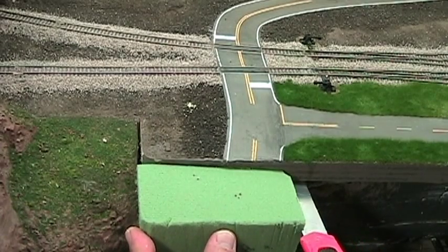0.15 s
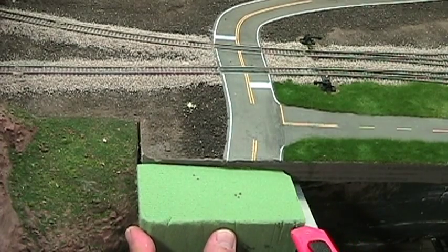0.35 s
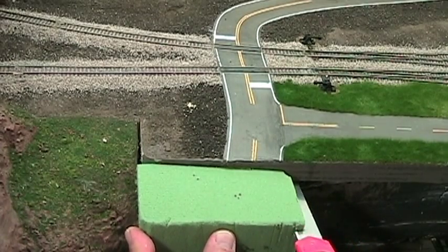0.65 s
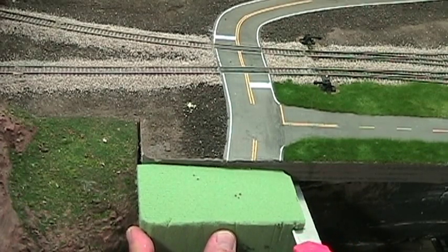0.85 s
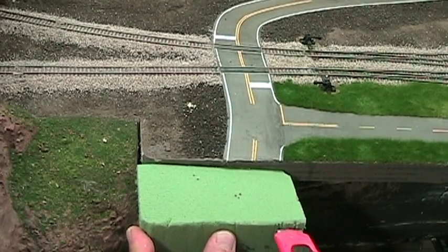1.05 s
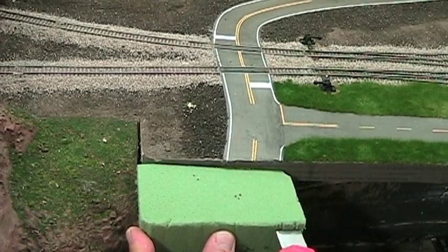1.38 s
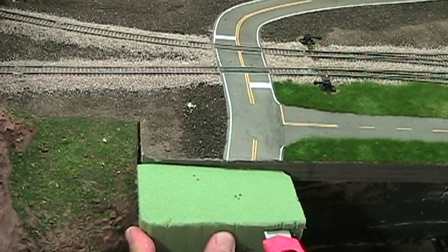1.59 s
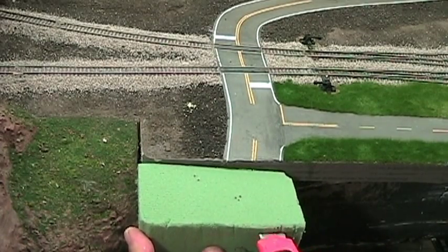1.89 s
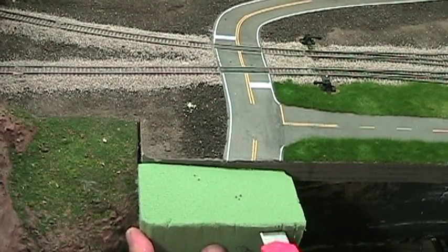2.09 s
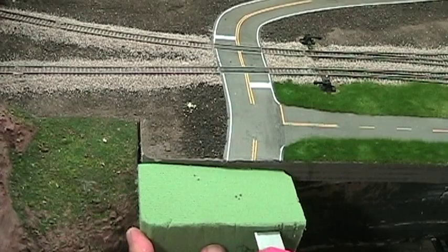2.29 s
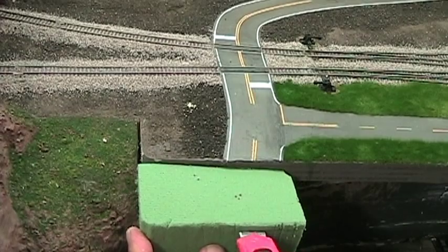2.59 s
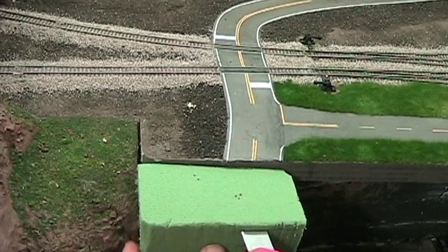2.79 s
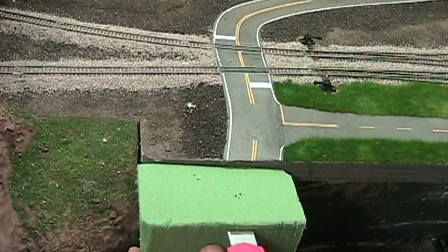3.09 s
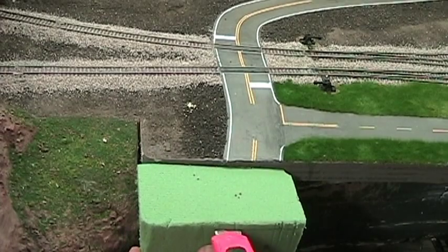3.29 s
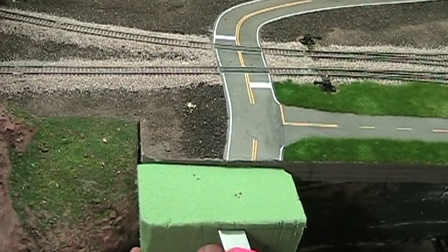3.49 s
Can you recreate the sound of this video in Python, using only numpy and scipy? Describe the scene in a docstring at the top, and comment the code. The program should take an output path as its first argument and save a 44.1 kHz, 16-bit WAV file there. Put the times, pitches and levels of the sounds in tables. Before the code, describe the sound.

Close up in a small room, a blade rasps through a foam block: brittle, bright strokes with snaps early on, smoother return scrapes, then fuller-bodied strokes and light scrapes at the end, over quiet room noise.

```python
"""A utility knife saws a block of rigid foam in a small room, close to a pair of microphones.
Room rumble and hissing air run throughout as coloured noise. The end of a light scrape opens the take,
then pushes burst dense streams of brittle cells, with snaps as clumps give way. Softer, smoother pulls
fall between them, and two end in dull shudders. The rasp gains body as the blade sinks deeper; a faint
sinking tone joins from 2.15 s, and light scrapes close the take. A ring and a short tail follow the knife."""
import sys
import numpy as np
from scipy import signal
from scipy.fft import rfft, irfft
from scipy.io import wavfile
from scipy.ndimage import uniform_filter1d

SR = 44100
rng = np.random.default_rng(int(sys.argv[2]) if len(sys.argv) > 2 else 0)


def digitize_waveform(pressure):
    """Quantize a signal to 16-bit integers and store it at the path in sys.argv[1].

    Rows of a 2-D input are taken as channels; values are limited to [-1, 1].
    """
    field = np.atleast_2d(pressure).T
    bounded = np.clip(field, -1, 1)
    quanta = np.round(bounded * 32767).astype(np.int16)
    wavfile.write(sys.argv[1], SR, quanta)


N = 160965  # length [samples]


def amp(db):
    """Decibels to gain."""
    return 10 ** (np.asarray(db) / 20)


def unit(x):
    """Scales to rms 1."""
    return x / np.sqrt(np.mean(x ** 2) + 1e-20)


def read(points, hz):
    """Reads a table along log frequency."""
    p = np.array(points, float)
    return np.interp(np.log(hz + 1), np.log(p[:, 0] + 1), p[:, 1])


def add(mix, start_s, sound):
    """Mixes a sound in at a time, dropping what falls outside the take."""
    at = round(start_s * SR)
    sound = sound[..., max(-at, 0):]
    part = mix[..., max(at, 0):][..., :sound.shape[-1]]
    part += sound[..., :part.shape[-1]]


def bell(hz, centre, octaves):
    """A bump of height 1 on the log frequency axis."""
    return np.exp(-.5 * (np.log2((hz + 1) / centre) / octaves) ** 2)


def bins(size=4096):
    """Frequencies on which colours are drawn."""
    return np.fft.rfftfreq(size, 1 / SR)


def colour(x, db):
    """Causal minimum-phase filter with the given gain curve, along the last axis."""
    log_gain = np.log(amp(np.r_[db, db[-2:0:-1]]))
    taps = np.fft.ifft(np.exp(np.conj(signal.hilbert(log_gain)))).real
    return signal.fftconvolve(x, taps[None, :len(db)], axes=1)[:, :x.shape[1]]


def noise(spectrum, channels):
    """Steady coloured room noise of rms 1."""
    return unit(colour(rng.standard_normal((channels, N)), read(spectrum, bins())))


# colour of the low room noise: (frequency [Hz], relative density [dB per Hz])
RUMBLE_SPECTRUM = [(20, -24), (35, -12), (55, -6), (110, -1), (180, -5), (280, -7.5), (450, -16),
                   (800, -16.5), (3000, -55)]
# how loud it reaches the microphones: (time [s], level [dB])
RUMBLE_LEVEL = [(0, -44), (.85, -43), (1.15, -48), (1.4, -43), (2.5, -43), (3.65, -42.5)]


def rumble():
    """Low room noise with a slowly moving level, opposite in the two channels."""
    level_db = np.interp(np.arange(N) / SR, *np.transpose(RUMBLE_LEVEL))
    return np.array([[1], [-1]]) * noise(RUMBLE_SPECTRUM, channels=1) * amp(level_db)


# colour of the airy room noise: (frequency [Hz], relative density [dB per Hz])
AIR_SPECTRUM = [(30, -11), (150, 0.5), (300, 3.5), (500, -4), (800, -1.5), (1200, 5), (1500, -5.5),
                (1950, 1.5), (2500, -2.5), (6000, -4.5), (10200, 1.5), (12500, -8), (15000, -30)]
AIR_DB = -43.5


def air():
    """Steady wide-band room noise; rows: direct and scattered sound."""
    return amp(AIR_DB) * noise(AIR_SPECTRUM, channels=2)


# resonances of block and knife: (frequency [Hz], width [octaves], gain [dB])
BODY = [(333, 0.047, 3), (430, 0.034, -10), (534, 0.14, 0.5), (760, 0.025, 0.5), (856, 0.015, 4.5),
        (966, 0.012, 4), (1060, 0.061, -2.5), (1180, 0.02, 3), (1340, 0.027, -5), (1393, 0.038, 3.5),
        (1642, 0.028, 3), (1900, 0.045, 3), (2113, 0.015, 2.5), (2680, 0.015, 3), (3010, 0.013, 2),
        (3410, .01, 2), (3860, 0.0077, 2), (4360, 0.0085, 2.5), (5500, .02, 2.5), (7660, .012, 0.5),
        (8500, .02, 0.5)]
NARROWEST_OCT = .024  # narrower resonances are widened to this
MIDDLE_HZ, MIDDLE_OCT, RING_OCT, HISS_HZ, HISS_OCT = 1840, 1, 0.14, 8600, 0.59
EDGE_ORDER, EDGE_LEAK_DB = 6.7, -10  # steepness of the bass edge, and the most it takes away


def foam(rasp, edge_hz, middle_db, ring_hz, ring_db, hiss_db):
    """Gain curve of block and blade: rasp, bass edge, resonances, middle, blade ring and hiss."""
    hz = bins()
    bass_cut = -10 * np.log10(1 + (edge_hz / (hz + 1)) ** (2 * EDGE_ORDER))
    edge = np.maximum(bass_cut, EDGE_LEAK_DB)
    body = sum(db * bell(hz, f, max(width, NARROWEST_OCT)) for f, width, db in BODY)
    middle = middle_db * bell(hz, MIDDLE_HZ, MIDDLE_OCT)
    ring = ring_db * bell(hz, ring_hz, RING_OCT)
    hiss = hiss_db * bell(hz, HISS_HZ, HISS_OCT)
    return read(rasp, hz) + edge + body + middle + ring + hiss


FLUTTER_S = 0.0034  # time constant of the level flutter
LARGEST = 4.36  # cap on cell size, in units of the spread


def cells(size, per_s, spread_db, smooth, flutter_db):
    """Cells burst in uneven clumps over the rub of the blade's flanks; rows: direct and scattered sound."""
    most = SR // 2
    sizes = amp(spread_db * np.minimum(rng.exponential(1, most), LARGEST))
    signs = rng.choice([-1, 1], (2, most))
    bursts = sizes * signs * (rng.random(most) < per_s / SR)
    rub = rng.standard_normal((2, most))
    memory = np.exp(-1 / (FLUTTER_S * SR))
    flutter = unit(signal.lfilter([1], [1, -memory], rng.standard_normal(most)))
    grain = np.sqrt(1 - smooth) * unit(bursts) + np.sqrt(smooth) * rub
    return (grain * amp(flutter_db * flutter))[:, :size]


HOLLOW_OCT, MIDDLE_SAG_DB = 0.29, 2.5  # the middle sinks by the sag over one stroke
RIPPLE_DB, RIPPLE_BINS = 1.0, 9  # random fine resonances: rms depth, smoothing [bins]


def stroke(grain, rasp, tone, count=4):
    """The colour shifts as the blade travels: the bass edge moves, the ring changes, fine resonances wander."""
    edge0, edge1, middle_db, ring_hz, ring0, ring1, hiss_db, hollow_hz, hollow_db = tone
    progress = np.linspace(0, 1, grain.shape[1])
    hollow = hollow_db * bell(bins(), hollow_hz, HOLLOW_OCT)
    out = 0
    for at in np.linspace(0, 1, count):
        edge_hz = edge0 * (edge1 / edge0) ** at
        middle_now = middle_db - MIDDLE_SAG_DB * (at - .5)
        ring_db = ring0 + (ring1 - ring0) * at
        db = foam(rasp, edge_hz, middle_now, ring_hz, ring_db, hiss_db)
        ripple = unit(uniform_filter1d(rng.standard_normal(len(db)), RIPPLE_BINS))
        coloured = unit(colour(grain, db + hollow + RIPPLE_DB * ripple))
        # neighbouring colours cross-fade
        out = out + coloured * np.maximum(1 - abs(progress - at) * (count - 1), 0)
    return unit(out)


# pulls and light scrapes: (start [s], length [s], level at full speed [dB],
# bass edge at the start [Hz], at the end [Hz], middle at mid-stroke [dB], blade ring [Hz],
# ring at the start [dB], at the end [dB], hiss [dB], hollow or bump [Hz], its gain [dB])
PULLS = [ (-.03, .13, -37, 900, 910, 0.5, 3400, 15, 8.2, 2.5, 5200, 3),
         (.443, .108, -31, 785, 450, -1, 3500, 1, 3, -3.5, 2870, -3.5),
         (0.532, 0.11, -20.5, 350, 230, -7.5, 3710, 6, 8.9, 2, 1300, -1),
         (.676, .114, -23, 376, 200, -0.5, 3670, 8.9, 3.1, 1, 2750, -6.5),
         (1.208, 0.17, -21, 440, 367, 4, 3740, 6.3, 5, 2, 1660, -6.5),
         (1.85, 0.14, -23.5, 260, 250, -1, 3230, 3, 2.4, -0.5, 740, -1.5),
         (1.982, 0.076, -37.5, 400, 400, 0, 3500, 4, 2, 1, 6000, 0),
         (2.075, 0.13, -21, 375, 303, -3, 3030, 2.8, 4.5, -4, 770, -0.5),
         (2.585, 0.12, -42.5, 250, 250, 1, 1950, 5, 8, -3, 4000, -3),
         (2.662, .18, -20.5, 280, 254, 1, 3140, 2, 3.9, -1.5, 1230, -0.5),
         (3.354, 0.1, -30, 280, 282, 1, 3200, 2, 2.5, -1, 700, -1),
         (3.401, 0.13, -20.5, 298, 270, 1, 3200, 0.33, 0.6, -1.5, 880, -5),
         (3.52, 0.14, -31, 258, 260, -1, 3300, 0.67, 1.3, -0.5, 4500, -1.5)]
# rasp of the foam on a pull: (frequency [Hz], relative density [dB per Hz])
PULL_RASP = [(100, -16.5), (300, -7), (420, -5.5), (530, -1.5), (740, -8.5), (950, -4), (1300, -4),
             (2000, -3), (2600, -4), (4200, -4), (4900, -6.5), (6800, -3), (8600, 2), (10600, 2.5),
             (12500, -11.5), (15000, -21.5)]
# grain: (bursts [per s], spread of sizes [dB], smooth share of power [0-1], flutter [dB rms])
PULL_GRAIN = (12000, 2.6, 0.72, 0.85)
PULL_ARCH, PULL_SKEW = 0.82, 0.97  # how round and how early the speed of a pull peaks


def pulls():
    """The blade slides along its slot, speeding up and slowing in one arch."""
    out = np.zeros((2, N))
    for start_s, length_s, db, *tone in PULLS:
        progress = np.linspace(0, 1, round(length_s * SR))
        speed = abs(np.sin(np.pi * progress ** PULL_SKEW)) ** PULL_ARCH
        scrape = stroke(cells(len(progress), *PULL_GRAIN), PULL_RASP, tone, count=2)
        add(out, start_s, scrape * speed * amp(db))
    return out


# force of each push, one curve per push: (time [s], level before the lift below [dB])
PUSH_FORCES = [
    [(0.09, -64), (0.096, -43), (0.174, -19), (0.232, -26.5), (0.288, -16.5), (0.342, -18), (0.37, -28),
     (0.392, -48), (0.41, -49)],
    [(0.8, -44), (0.814, -36), (0.932, -16), (0.976, -19), (1.086, -18), (1.12, -22.5), (1.14, -62),
     (1.15, -52)],
    [(1.385, -43), (1.413, -37), (1.507, -18), (1.621, -18), (1.649, -23.5), (1.707, -16), (1.751, -21.5),
     (1.757, -27.5), (1.83, -47.5)],
    [(2.205, -40.5), (2.237, -23), (2.285, -27.5), (2.347, -18), (2.439, -19.5), (2.511, -17.5),
     (2.563, -21.5), (2.6, -53)],
    [(2.84, -38), (2.888, -32), (2.904, -26), (2.916, -34.5), (2.998, -17), (3.03, -18.5), (3.07, -29)],
    [(3.07, -33), (3.1, -20.5), (3.17, -14.5), (3.21, -19.5), (3.254, -17), (3.278, -23), (3.335, -49)],
]
PUSH_LIFT_DB = 1
# colour of each push: (bass edge at the start [Hz], at the end [Hz], middle at mid-stroke [dB],
# blade ring [Hz], ring at the start [dB], at the end [dB], hiss [dB], hollow or bump [Hz], its gain [dB])
PUSH_COLOURS = [ (1070, 1060, 3, 3700, 2.5, 7.5, -0.5, 7600, 1.5),
                (1030, 910, 5.5, 3720, 8.5, 8, 2.5, 4100, -2), (1060, 510, -2.5, 2800, -1, 0, -2, 3000, -1),
                (1010, 440, -4, 3560, 0, 11.5, -0.5, 3400, -1), (710, 320, -4, 3420, 3, 7.5, 0, 1500, -3.5),
                (470, 290, -1.5, 3080, 5.5, 4, 2.5, 1120, -4)]
# rasp of the foam on a push, also used by the snaps: (frequency [Hz], relative density [dB per Hz])
PUSH_RASP = [(100, -22), (300, -7.5), (550, -2), (800, -8.5), (1100, -0.5), (1600, -1.5), (2000, -1.5),
             (2500, -2), (4200, -1.5), (5000, -5.5), (6600, -6), (8400, 0), (10700, 0), (12500, -11),
             (15000, -26)]
# grain: (bursts [per s], spread of sizes [dB], smooth share of power [0-1], flutter [dB rms])
PUSH_GRAIN = (7000, 3.2, 0.42, 0.95)


def pushes():
    """The edge is driven into fresh foam and bursts its cells as hard as the force curve says."""
    out = np.zeros((2, N))
    for force, tone in zip(PUSH_FORCES, PUSH_COLOURS):
        s, db = np.transpose(force)
        t = np.arange(s[0], s[-1], 1 / SR)
        rasping = stroke(cells(len(t), *PUSH_GRAIN), PUSH_RASP, tone)
        add(out, s[0], rasping * amp(PUSH_LIFT_DB + np.interp(t, s, db)))
    return out


# the blade catches and snaps free: (time [s], peak level [dB], hiss [dB])
SNAPS = [(.099, -20.5, 10), (.307, -7, -12), (.3375, -4.5, 15), (0.4537, -17, 17), (.846, -13, 16),
         (0.9245, -2.5, -11), (.932, -7.5, -6), (1.024, -2.5, -18), (1.037, -20, -2), (1.092, -1, 6),
         (1.152, -23, 17), (1.183, -17, 10), (2.9034, -10, 4.5), (2.9375, -15.5, 6), (2.962, -9.5, 2)]
SNAP_S = 0.0013  # decay time constant


def snaps():
    """A clump of cells gives way at once: a fast-dying noise burst through the foam's colour."""
    out = np.zeros((2, N))
    t = np.arange(SR // 20) / SR
    for s, db, hiss_db in SNAPS:
        burst = rng.standard_normal((2, len(t))) * np.exp(-t / SNAP_S)
        gain_db = foam(PUSH_RASP, edge_hz=1070, middle_db=4.5, ring_hz=3770, ring_db=7, hiss_db=hiss_db)
        crack = colour(burst, gain_db)
        add(out, s, amp(db) * crack / abs(crack[0]).max())
    return out


# the block rings on briefly after each stroke: (frequency [Hz], t60 [s], level [dB])
AFTER_RING = [(1190, .18, -39), (1245, .18, -38), (1965, .16, -40), (2105, .18, -38), (2670, .12, -35)]


def after_ring(x):
    """Lightly damped modes fed by the rasp."""
    t = np.arange(SR // 3) / SR
    ring = 0
    for hz, t60, db in AFTER_RING:
        mode = amp(-60 * t / t60) * np.sin(2 * np.pi * hz * t)
        ring = ring + amp(db) * mode / np.linalg.norm(mode)
    return signal.fftconvolve(x, ring[None], axes=1)[:, :N]


# decay of the small room: (frequency [Hz], t60 [s])
ROOM_DECAY = [(200, 1), (2000, 0.17), (12000, 0.14)]
ROOM_DB = -19.5


def room(x):
    """A weak, short tail of decaying noise whose treble dies first."""
    hz, t, z = signal.stft(rng.standard_normal((2, SR // 2)), SR, nperseg=256)
    decay = amp(-60 * t / read(ROOM_DECAY, hz)[:, None])
    tail = signal.istft(z * decay, SR)[1]
    return amp(ROOM_DB) * signal.fftconvolve(x, tail / np.linalg.norm(tail[0]), axes=1)[:, :N]


# the block shudders dully as a pull ends: (time [s], level [dB], centre [Hz])
BUMPS = [(.607, -50, 290), (.757, -40.5, 345)]
BUMP_S, BUMP_OCT, BUMP_DEPTH_DB = 0.013, 1.1, 40  # time to the peak, width, height of the colour


def bumps():
    """Soft, low shudders of the block: coloured noise that swells and dies."""
    out = np.zeros(N)
    t = np.arange(SR // 8) / SR
    swell = t / BUMP_S * np.exp(1 - t / BUMP_S)
    for s, db, hz in BUMPS:
        gain_db = BUMP_DEPTH_DB * bell(bins(), hz, BUMP_OCT)
        shudder = unit(colour(rng.standard_normal((1, len(t))), gain_db)[0])
        add(out, s, amp(db) * swell * shudder)
    return out


# a faint low hum: (time [s], frequency [Hz], peak level [dB])
HUM = [(2.15, 217.6, -75), (2.21, 207, -50), (2.4, 160, -58.5), (2.778, 155.5, -61.5), (2.87, 158, -52.5),
       (3.25, 158.5, -51), (3.34, 151, -82)]


def hum():
    """One faint low sine that sinks and then roughly holds."""
    s, hz, db = np.transpose(HUM)
    t = np.arange(N) / SR
    phase = 2 * np.pi * np.cumsum(np.interp(t, s, hz)) / SR
    sounding = (t > s[0]) * (t < s[-1])
    return amp(np.interp(t, s, db)) * np.sin(phase) * sounding


# how alike the microphones hear: (frequency [Hz], likeness [0-1])
LIKENESS = [(100, .95), (600, .97), (1200, .996), (2800, .995), (4000, .97), (6300, .86), (9500, .92),
            (12500, .8), (15000, .85)]
# phase by which left leads: (frequency [Hz], lead [radians])
LEAD = [(3400, 0), (5000, -.3), (6300, -.75), (9500, -1.1), (12500, -2), (15000, -3)]
# left over right: (frequency [Hz], balance [dB])
BALANCE = [(200, 0), (380, -.4), (620, 2.3), (900, .8), (1300, 0), (3300, 0), (5500, -1), (9000, -1),
           (15000, -2.3)]


def microphone_pair(x):
    """Two close microphones: alike in the middle range, parted in the treble by scattered sound."""
    hz = np.fft.rfftfreq(N, 1 / SR)
    like = np.clip(read(LIKENESS, hz), 0, 1)
    # each side takes half of the lead and half of the balance
    lean = np.exp(.5j * read(LEAD, hz)) * amp(read(BALANCE, hz) / 2)
    same = np.sqrt((1 + like) / 2) * rfft(x[0])
    apart = np.sqrt((1 - like) / 2) * rfft(x[1])
    return irfft(np.array([(same + apart) * lean, (same - apart) / lean]), N)


def scene():
    """Knife, ring, room tail and air reach the microphone pair; rumble, bumps and hum are added after it."""
    knife = pulls() + pushes() + snaps()
    heard = air() + knife + after_ring(knife) + room(knife)
    return rumble() + microphone_pair(heard) + bumps() + hum()


LIMIT, CUT_HZ = .85, 15300  # ceiling of the peaks [full scale], top of the band


def record(dry):
    """The loudest peaks are softly rounded off; then the band limit."""
    rounded = dry / (1 + (dry / LIMIT) ** 6) ** (1 / 6)
    taps = signal.firwin(401, CUT_HZ, window=("kaiser", 9), fs=SR)
    return signal.oaconvolve(rounded, taps[None], "same")


dry = scene()
out = record(dry)
digitize_waveform(out)
```